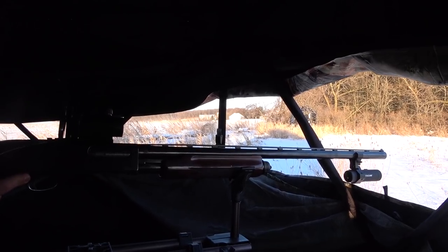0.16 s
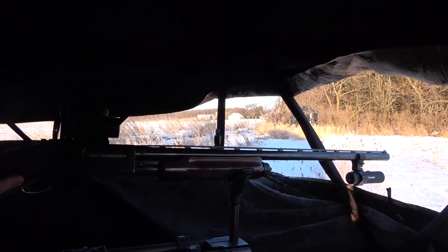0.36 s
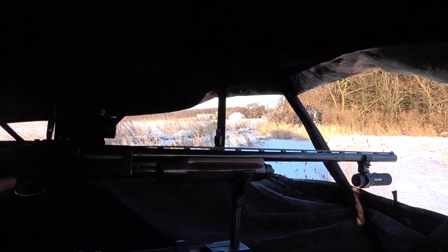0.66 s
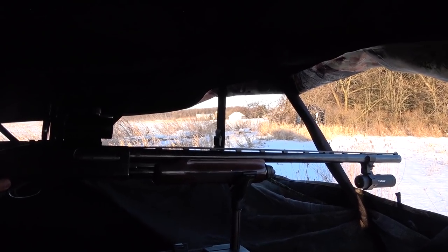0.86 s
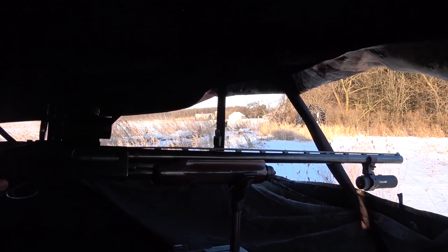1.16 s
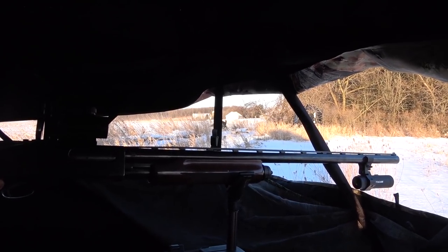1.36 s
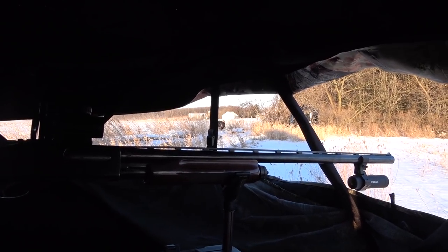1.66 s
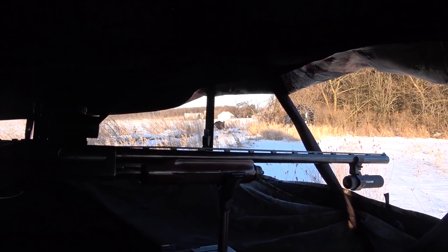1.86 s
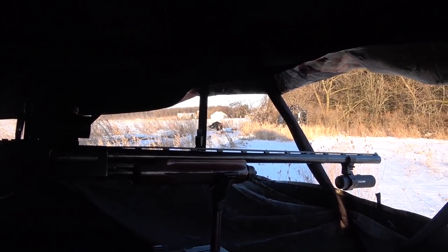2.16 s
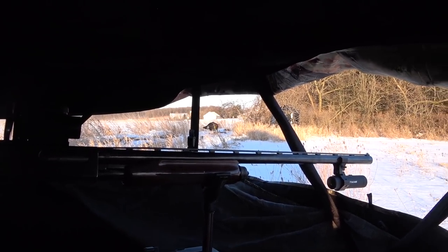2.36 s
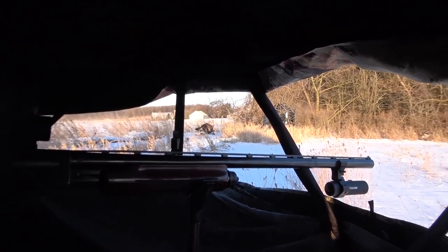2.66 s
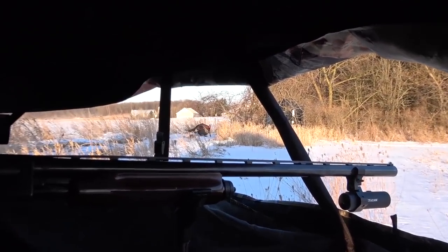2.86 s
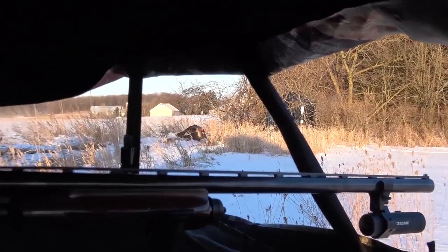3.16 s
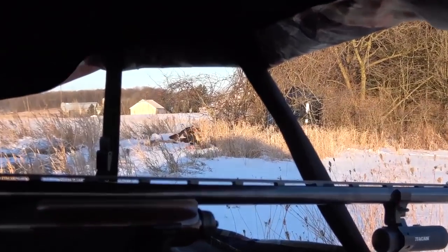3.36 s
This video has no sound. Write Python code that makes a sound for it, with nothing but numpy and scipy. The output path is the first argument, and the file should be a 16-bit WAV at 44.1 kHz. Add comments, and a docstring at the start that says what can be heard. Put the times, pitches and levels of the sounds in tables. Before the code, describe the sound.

A distant turkey gives a raspy call from 1 to 1.5 seconds, then five echoing, rising and falling yelps from 1.7 seconds to the end at about 3.5. Low wind rumbles throughout with a very faint camera whine. Nearby fabric rustles around 0.2 seconds, and a far hum swells near 0.7. A songbird whistles faintly at first and from 1.6 to 2.6. Gear scrapes lightly twice around 2.3.

```python
"""Low wind rumbles around a fabric blind in a snowy field, and a songbird whistles faintly in near-pure
tones. A camera whines thinly, fabric rustles and a far hum swells once. Then a distant turkey gives one
raspy call and five arched yelps: the harmonics of its vibrating membrane slide through the throat
resonances, scatter in the reeds and echo from the wood's edge. Between yelps, gear scrapes twice nearby."""
import sys
import numpy as np
from scipy import signal
from scipy.fft import rfft, irfft, next_fast_len
from scipy.io import wavfile
from scipy.ndimage import uniform_filter1d, map_coordinates

SR = 44100
rng = np.random.default_rng(int(sys.argv[2]) if len(sys.argv) > 2 else 0)


def pcm_store(signal):
    """Save signal as 16-bit PCM."""
    levels = np.round(np.clip(np.atleast_2d(signal), -1, 1) * 32767)
    wavfile.write(sys.argv[1], SR, levels.astype(np.int16).T)


N = 154350


def amp(db):
    """Decibels to amplitude ratio."""
    return 10 ** (np.asarray(db) / 20)


def unit(x):
    """Normalisation to rms 1."""
    return x / np.sqrt(np.mean(x ** 2) + 1e-20)


def along(points, hz):
    """Interpolation on a log frequency axis."""
    frequencies, values = np.transpose(points)
    return np.interp(np.log(hz + 1), np.log(frequencies + 1), values)


def clock():
    """Sample times in seconds."""
    return np.arange(N) / SR


def curves(rows):
    """Linear interpolation in time of each column after the first."""
    times, *columns = np.transpose(rows)
    return [np.interp(clock(), times, column) for column in columns]


def wobble(rate):
    """Random modulation: a spline through rate knots a second."""
    return map_coordinates(rng.standard_normal(int(N * rate / SR) + 4), [clock() * rate])


def noise(spectrum, tilt_db=0):
    """Spectral shaping: coloured noise of rms 1, tilted per octave."""
    size = next_fast_len(N + 8192)
    hz = np.fft.rfftfreq(size, 1 / SR)
    gain = amp(along(spectrum, hz) + tilt_db * np.log2(hz + 1))
    return unit(irfft(rfft(rng.standard_normal(size)) * gain, size)[:N])


def phase(hz):
    """Phase is the integral of frequency."""
    return 2 * np.pi * np.cumsum(hz) / SR


def gate(t, length, attack, release):
    """Amplitude envelope: rise, hold until length, release."""
    return np.sin(np.pi / 2 * np.clip(t / attack, 0, 1)) * np.clip(1 - (t - length) / release, 0, 1)


# Gusts: time_s, sway_db, rumble_db
GUSTS = [(0.0, -48, -64), (0.26, -33, -47.5), (0.49, -32.5, -60.5), (1.03, -42, -45.5), (1.12, -30, -52),
         (1.24, -45.5, -52.5), (1.51, -32.5, -53), (2.55, -32.5, -44.5), (2.7, -29, -55.5),
         (2.97, -31, -45.5), (3.18, -27, -44.5), (3.44, -27.5, -44)]
# Upper bass of the wind: time_s, level_db
FLAP_LEVEL = [(0, -65), (.25, -64.5), (.5, -73), (1.0, -73.5), (1.3, -88), (1.7, -64.5), (1.95, -61.5),
              (2.15, -66.5), (2.5, -56), (2.75, -67), (2.97, -63.5), (3.15, -67), (3.5, -56)]
# Spectra of the four wind bands, lowest first: frequency_hz, density_db
SWAY_SPECTRUM = [(3, -41), (8, -19.5), (12, -2.5), (14.5, -1.5), (18, -12), (26, -33.5), (45, -36),
                 (100, -120)]
RUMBLE_SPECTRUM = [(15, -27.5), (24, 2.5), (31, -2.5), (45, -3.5), (62, -15), (77, -6.5), (97, -32),
                   (150, -50), (500, -120)]
FLAP_SPECTRUM = [(50, -55), (95, 1.5), (117, 5.5), (165, -9), (260, -21), (900, -120)]
AIR_SPECTRUM = [(60, -5), (130, -5), (170, -1.5), (235, 2), (350, -2), (520, -2.5), (800, -6), (1000, -9),
                (1250, -8), (1450, -18), (1800, -22.5), (3000, -25.5), (3500, -23), (4200, -27.5),
                (5200, -23.5), (6300, -27.5), (8000, -28.5), (12000, -30), (15500, -30.5)]

def wind(air_db=-60.5):
    """Amplitude-modulated noise: three low bands surge around the blind over the rush of open air."""
    sway_db, rumble_db = curves(GUSTS)
    flap_db, = curves(FLAP_LEVEL)
    sway = noise(SWAY_SPECTRUM)
    running_rms = np.sqrt(np.abs(uniform_filter1d(sway ** 2, size=SR // 4)) + 1e-6)
    rumble = amp(rumble_db + 1.5 * wobble(8.07)) * noise(RUMBLE_SPECTRUM)
    flap = amp(flap_db) * noise(FLAP_SPECTRUM)
    air = amp(air_db + 0.27 * wobble(6.61)) * noise(AIR_SPECTRUM)
    return amp(sway_db) * sway / running_rms + rumble + flap + air


# Hiss spectrum: frequency_hz, density_db
HISS_SPECTRUM = [(1300, -19), (1800, -0.5), (3000, -0.5), (3500, 1.5), (4200, -3.5), (5200, -0.5),
                 (6300, -9), (9000, -10.5), (15000, -24)]
# Hiss envelope: time_s, level_db
HISS_LEVEL = [(0, -74), (.35, -74), (.55, -76.5), (1.0, -77), (1.5, -73), (2.5, -74.5), (3.5, -72.5)]

def hiss():
    """Broadband noise under a slow envelope: a faint outdoor hiss ebbs and returns."""
    db, = curves(HISS_LEVEL)
    return amp(db) * noise(HISS_SPECTRUM)


# Songbird notes: start_s, length_s, first_hz, last_hz, end_level_db, growth_db, waver_ratio
WHISTLES = [(0, .17, 2620, 2530, -81, 3, 0.012), (0.255, 0.1, 2430, 2340, -79.5, -4, 0.015),
            (1.626, .065, 3500, 3390, -72, -8, .006), (1.779, 0.076, 3640, 3610, -71.5, -8, .005),
            (1.856, 0.17, 3653, 3567, -77, -5.5, .006), (2.126, .068, 5950, 5080, -70, 7, .018),
            (2.191, 0.086, 4930, 4300, -69.5, 9, 0.0079), (2.303, 0.058, 4400, 4190, -58.5, 3.5, .003),
            (2.412, 0.071, 5080, 4840, -61, -0.5, 0.0052), (2.494, 0.069, 4000, 3810, -65.5, 0, 0.0038),
            (2.56, 0.086, 3790, 4000, -72, -3, .009)]

def songbird(edge_s=0.04):
    """Frequency glides: each nearly pure whistle slides fast, then levels out."""
    out = np.zeros(N)
    for start, length, first_hz, last_hz, db, growth_db, waver in WHISTLES:
        t = clock() - start
        progress = np.clip(t / length, 0, 1)
        glide_hz = last_hz + (first_hz - last_hz) * (1 - progress) ** 1.5
        hz = glide_hz * (1 + waver * wobble(400))
        level = amp(db + growth_db * (progress - 1) + 2.3 * wobble(90))
        out += level * gate(t, length - edge_s / 2, edge_s, edge_s) * np.sqrt(2) * np.sin(phase(hz))
    return out


# Reverberation time of the wood: frequency_hz, t60_s
WOODS_DECAY = [(300, 0.1), (1300, 1.14), (4000, 1.9), (10000, 0.43)]

def woods(x, build_s=0.019):
    """Reverberation: the trees return a diffuse echo in which each frequency decays at its own rate."""
    hz, t, spectra = signal.stft(rng.standard_normal(SR), SR, nperseg=256)
    decay = amp(-60 * t / along(WOODS_DECAY, hz)[:, None])
    tail = signal.istft(spectra * decay * (1 - np.exp(-t / build_s)), SR, nperseg=256)[1]
    return signal.fftconvolve(x, tail / np.linalg.norm(tail))[:N]


# Hum envelope: time_s, level_db
HUM_LEVEL = [(0, -66.5), (.13, -66), (.22, -76), (.47, -70), (.63, -60.5), (.74, -58), (.9, -68.5),
             (1.4, -72), (1.8, -73), (2.2, -76), (2.31, -66.5), (2.45, -69.5), (3.5, -77.5)]

def hum(pitch_hz=430.5):
    """A modulated sinusoid: the far hum wavers and has one main swell."""
    db, = curves(HUM_LEVEL)
    return amp(db + 0.69 * wobble(12)) * np.sqrt(2) * np.sin(phase(pitch_hz + 2.22 * wobble(19.85)))


# Camera tones: pitch_hz, relative_level_db, flicker_db
WHINE_TONES = [(8958, -102, 3), (11843, -99, 4), (13071, -93.5, 1), (13151, -92, 1), (13614, -100.5, 1),
               (13701, -100, 1)]

def whine():
    """Superposition: thin, inharmonic tones of the camera, the lower ones flickering most."""
    return sum(amp(db + 9.5 + flicker_db * wobble(4.1)) * np.sin(phase(hz + 7 * wobble(60)))
               for hz, db, flicker_db in WHINE_TONES)


def brush(start, decay, spectrum, tilt_db=0):
    """Friction noise: one brief, grainy contact decays exponentially."""
    t = np.maximum(clock() - start, 0)
    grains = unit(amp(4 * wobble(900)) * noise(spectrum, tilt_db))
    return (1 - np.exp(-t / (0.069 * decay))) * np.exp(-t / decay) * np.sqrt(2) * grains


# Fabric contacts: start_s, decay_s, level_db, tilt_db_per_octave
RUSTLES = [(.09, 0.018, -67.5, -2), (0.206, 0.019, -59, -3), (.222, 0.026, -61.5, -4.5),
           (.288, 0.015, -70, 1), (0.916, 0.0015, -59, 2), (2.843, 0.016, -66.5, 0), (3.19, 0.015, -69, 2)]
# Fabric spectrum: frequency_hz, density_db
FABRIC_SPECTRUM = [(200, -17), (700, 0.5), (2500, -3), (4500, -1.5), (8000, -13.5), (15000, -18)]

def rustles():
    """Friction on fabric close by gives short broadband bursts."""
    return sum(amp(db) * brush(start, decay, FABRIC_SPECTRUM, tilt) for start, decay, db, tilt in RUSTLES)


def voice(hz, roughness, throat, third_db=0, jitter_rate=230):
    """Source and filter: the throat shapes a membrane's harmonics; jitter and shimmer make them rasp."""
    core = phase(hz * (1 + 0.0034 * wobble(jitter_rate)))
    jitter = phase(hz * roughness * 0.066 * wobble(jitter_rate))
    jitter -= uniform_filter1d(jitter, size=SR // 25)  # without slow drift the pitch stays centred
    shimmer = unit(amp(roughness * 3.8 * wobble(jitter_rate)))
    fundamental = amp(along(throat, hz)) * np.sin(core + jitter / 2)
    overtones = sum(amp(along(throat, k * hz) + third_db * (k == 3)) * np.sin(k * (core + jitter))
                    for k in range(2, 6))
    return np.sqrt(2) * (fundamental + shimmer * overtones)


# The turkey's opening call: time_s, pitch_hz, relative_level_db
RASP_CONTOUR = [(1.019, 492.3, -76), (1.05, 510, -69.5), (1.129, 545, -64.5), (1.173, 584, -62.5),
                (1.21, 616.4, -61), (1.301, 619, -64.5), (1.42, 607, -63), (1.471, 575, -66.5)]
# Throat response in that call: frequency_hz, gain_db
RASP_THROAT = [(500, -8), (800, -19), (1050, -6), (1250, -0.5), (1580, -4), (1800, -13), (2300, -27),
               (3500, -36)]

def rasp():
    """Irregular vibration makes the long opening call hoarse."""
    hz, db = curves(RASP_CONTOUR)
    start, end = RASP_CONTOUR[0][0], RASP_CONTOUR[-1][0]
    envelope = amp(db) * gate(clock() - start, end - start, 0.009, 0.021)
    return envelope * voice(hz, roughness=1.5, throat=RASP_THROAT)


def reeds(x, delay_s=0.022):
    """Multiple scattering: quick reflections from reeds and scrub smear a far call."""
    t = np.arange(SR // 4) / SR
    scatter = rng.standard_normal(len(t)) * t * np.exp(-t / delay_s)
    return signal.fftconvolve(x, scatter / np.linalg.norm(scatter))[:N]


# Yelps: start_s, length_s, top_hz, relative_level_db, bend_exponent, roughness_ratio, third_harmonic_db
YELPS = [(1.67, 0.18, 668.7, -53.5, 1.4, .9, -5.5), (2.012, 0.23, 708.3, -52.5, 1.13, 0.6, -0.5),
         (2.436, .275, 704, -53, .85, 0.51, 1.5), (2.896, .285, 669.3, -55, 1.15, 0.7, 1),
         (3.376, 0.22, 664, -53.5, 1.43, 0.8, 1)]
# Pitch fall of a yelp: progress_fraction, height_fraction
PITCH_FALL = [(0, 1), (.22, .73), (.5, .51), (.8, .31), (1, 0.11)]
# Throat response in a yelp: frequency_hz, gain_db
YELP_THROAT = [(450, -9.5), (600, -9.5), (720, -6.5), (900, -18), (1040, -19.5), (1170, 0.5), (1300, 0),
               (1420, -4), (1550, -1), (1670, -12.5), (1830, -19.5), (2100, -24), (2600, -36),
               (3500, -24.5)]

def yelps(rise_s=0.06, start_hz=573, end_hz=425.5, fade_db_per_s=40):
    """Resonance: as the pitch leaps and sinks, the second harmonic rings in the throat, then the third."""
    out = np.zeros(N)
    for start, length, top_hz, db, bend, roughness, third_db in YELPS:
        t = np.clip(clock() - start, 0, 1)
        rise = start_hz + (top_hz - start_hz) * np.sin(np.pi / 2 * t / rise_s) ** 2
        progress = np.clip((t - rise_s) / (length - rise_s), 0, 1) ** bend  # over 1 holds the top longer
        fall = end_hz + (top_hz - end_hz) * np.interp(progress, *np.transpose(PITCH_FALL))
        hz = np.where(t < rise_s, rise, fall)
        envelope = amp(db - fade_db_per_s * t) * gate(t, length, attack=0.04, release=0.02)
        out += envelope * voice(hz, roughness, YELP_THROAT, third_db)
    return out


# Gear contacts inside the blind: start_s, decay_s, level_db
SCRAPES = [(2.301, .022, -63), (2.382, 0.026, -62.5)]
# Gear spectrum: frequency_hz, density_db
GEAR_SPECTRUM = [(200, -6), (520, -4), (900, -14), (1900, 4), (2150, -6), (2310, 14), (2480, 0), (3300, 2),
                 (4500, 1.5), (7000, -6), (9500, -12), (10800, -0.5), (13000, -3.5), (15500, -3.5)]

def scrapes():
    """Friction excites a resonance: two light scrapes of hard gear, each with a short ring."""
    return sum(amp(db) * brush(start, decay, GEAR_SPECTRUM) for start, decay, db in SCRAPES)


def scene():
    """Superposition of far birds, their reflections, near contacts and the background."""
    calls = yelps() + rasp()
    song = songbird()
    turkey = amp(-1.5) * (calls + amp(-5) * reeds(calls)) + amp(-6.5) * woods(calls)
    birds = turkey + song + amp(-21) * woods(song)
    return (birds + rustles() + scrapes() + wind() + hiss() + hum() + whine())[None]


def record(dry, cutoff_hz=15700):
    """Band limiting: a low-pass filter removes the highest treble."""
    edge = SR // 20
    padded = np.pad(dry[0], edge, mode="reflect", reflect_type="odd")
    lowpass = signal.firwin(511, cutoff_hz, fs=SR, window="blackman")
    return signal.fftconvolve(padded, lowpass, "same")[None, edge:edge + N]


dry = scene()
out = record(dry)
pcm_store(out)
```